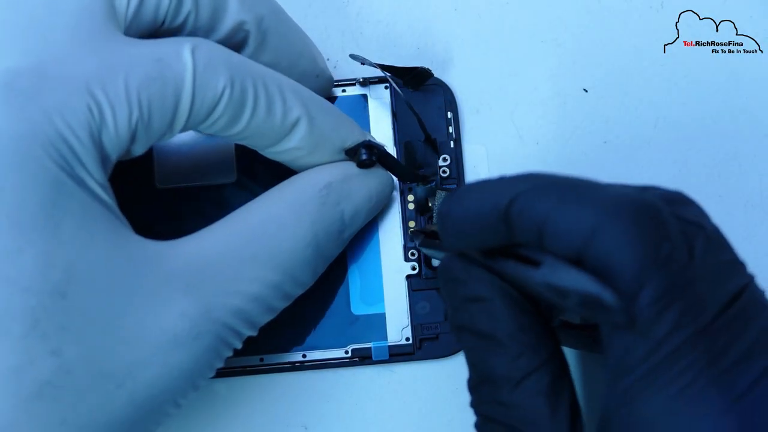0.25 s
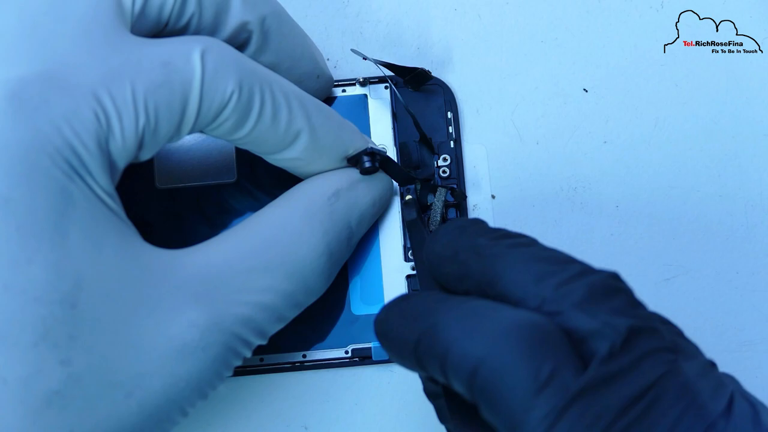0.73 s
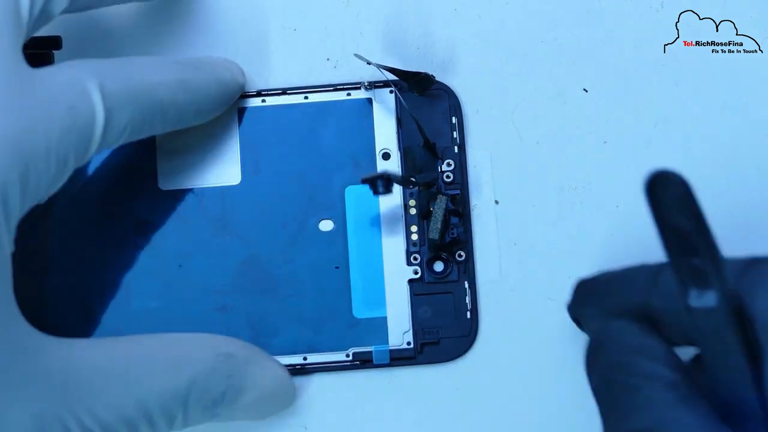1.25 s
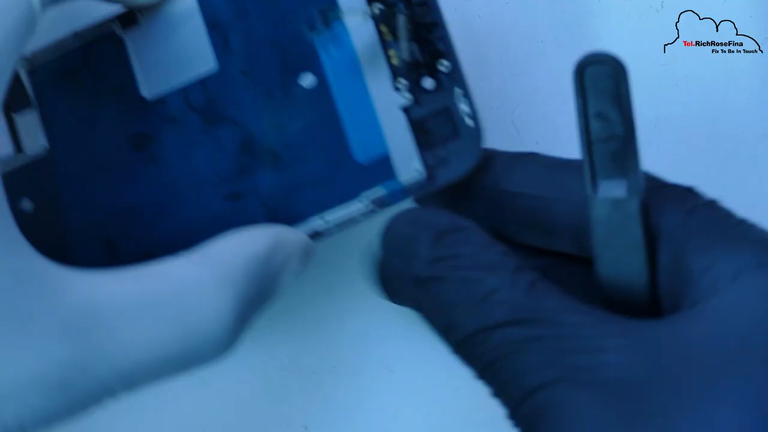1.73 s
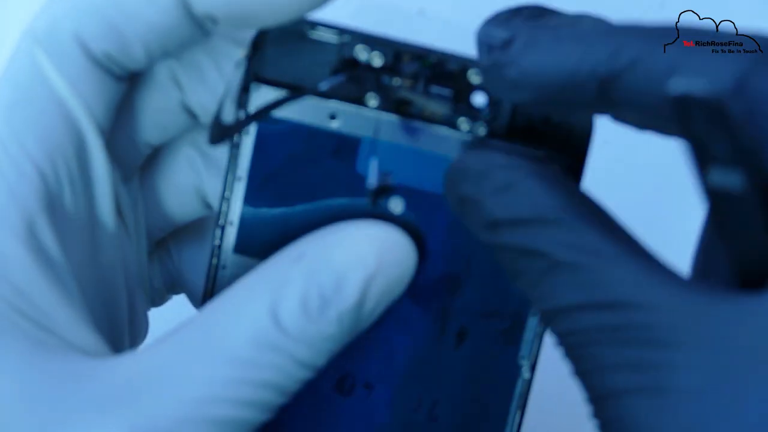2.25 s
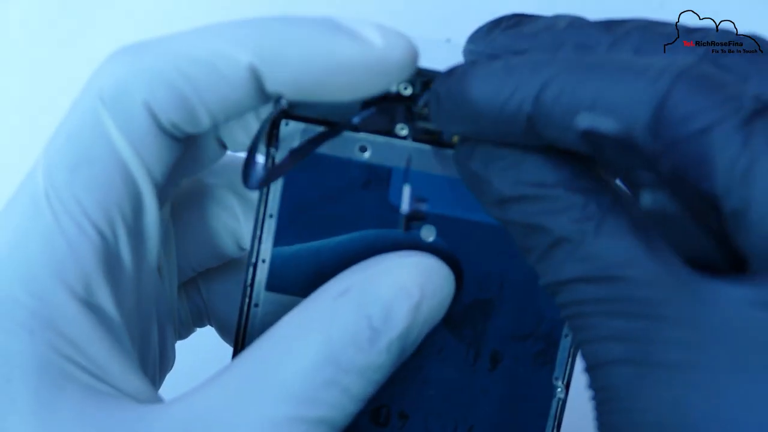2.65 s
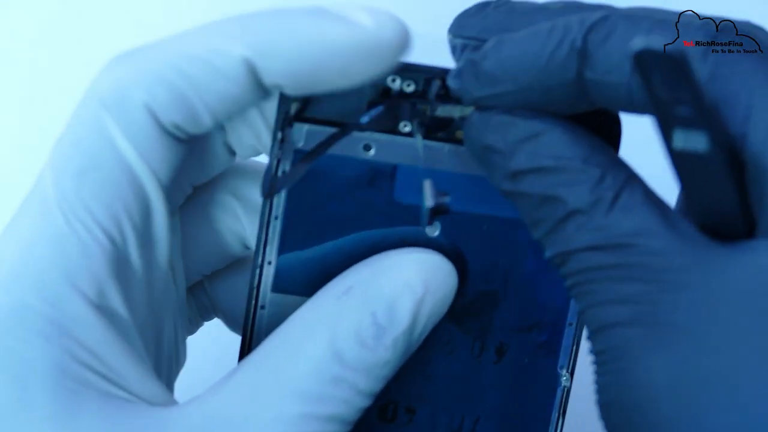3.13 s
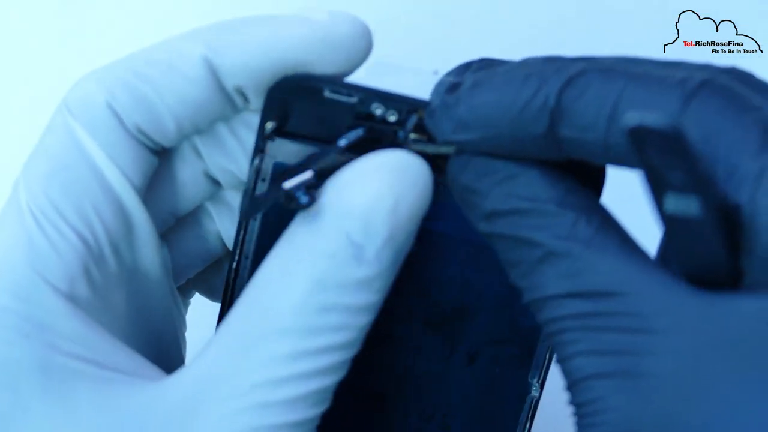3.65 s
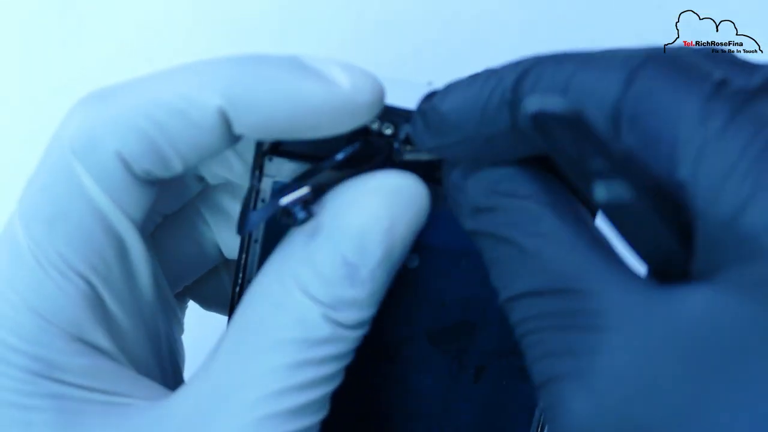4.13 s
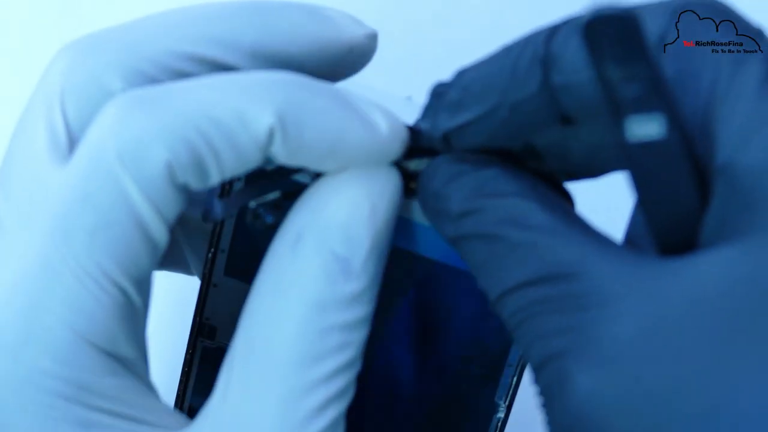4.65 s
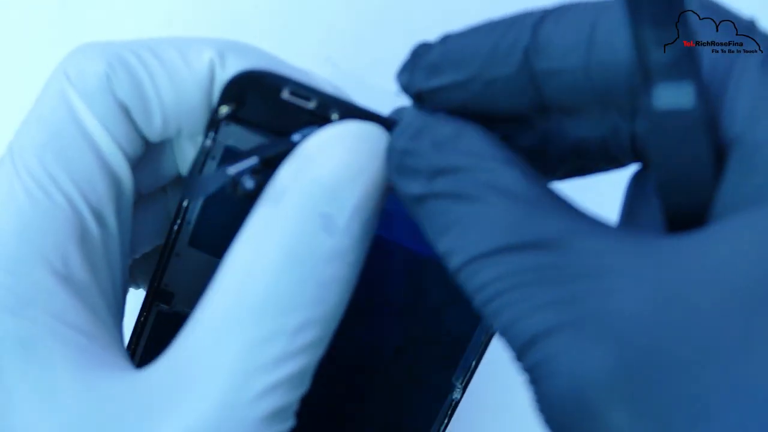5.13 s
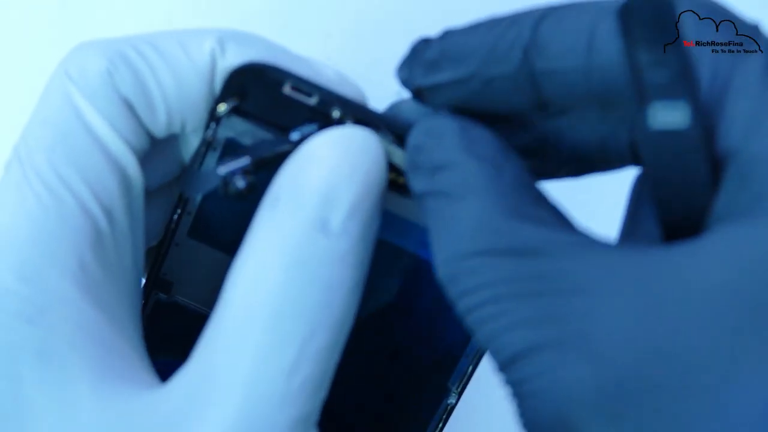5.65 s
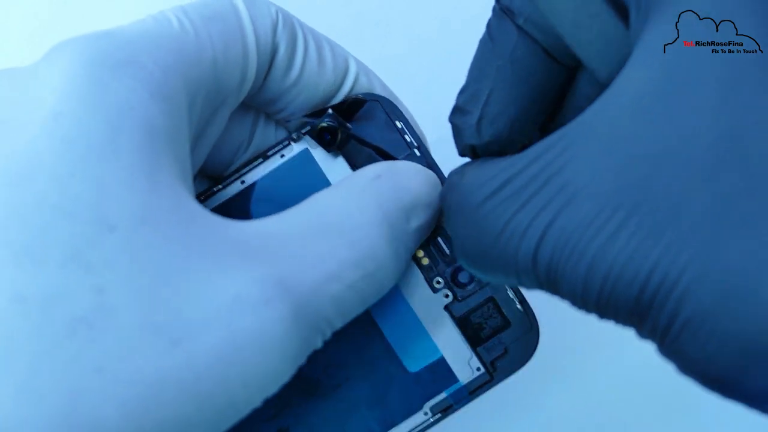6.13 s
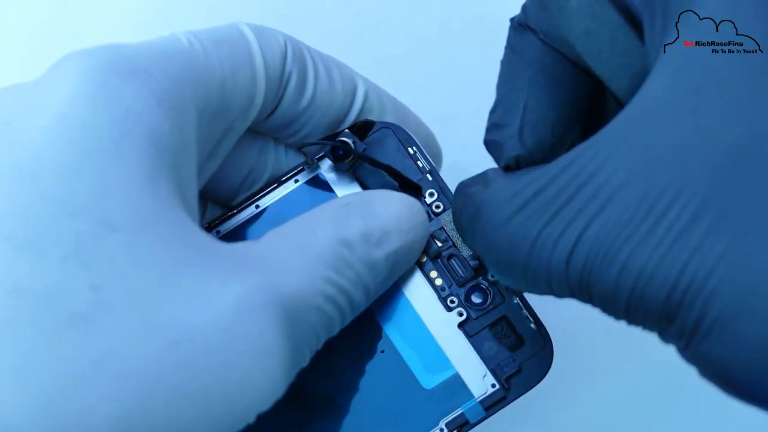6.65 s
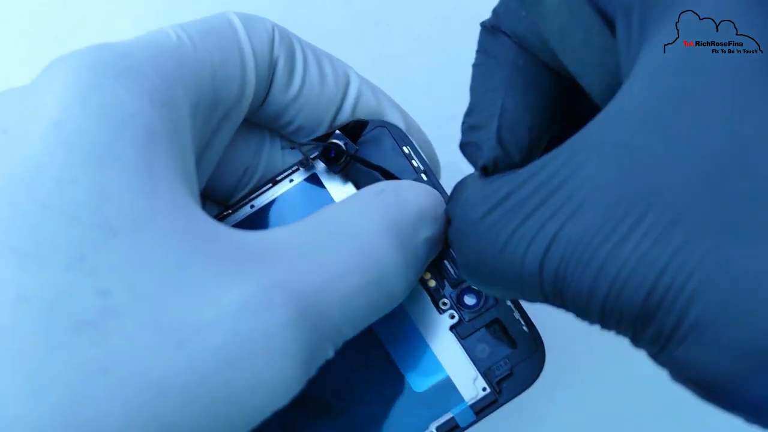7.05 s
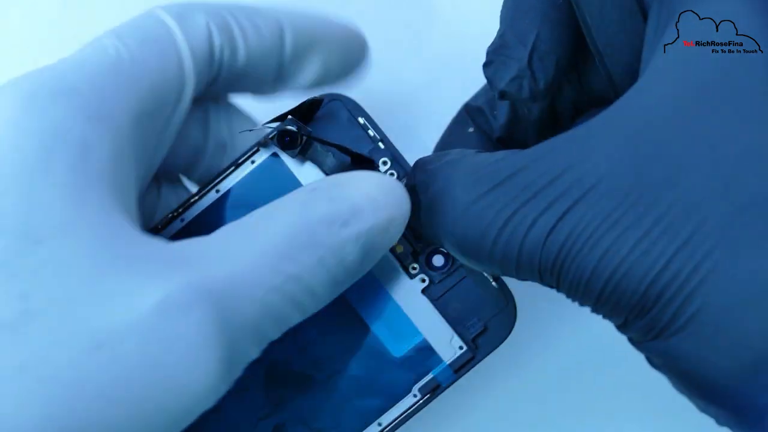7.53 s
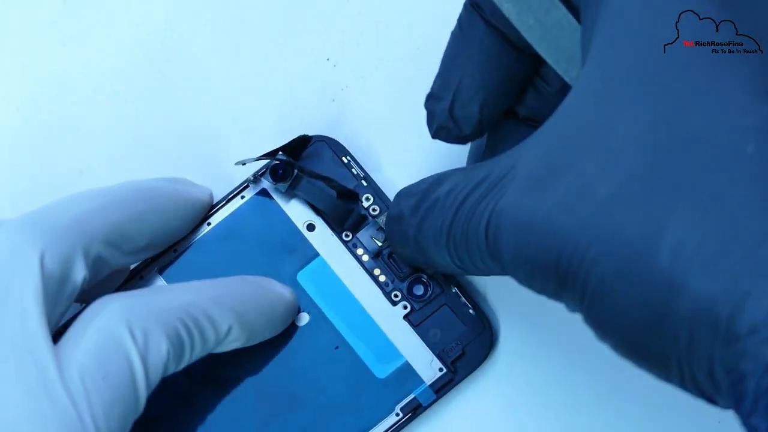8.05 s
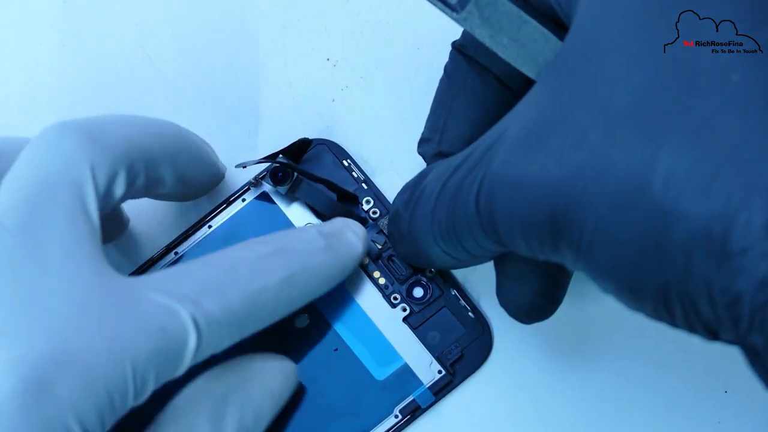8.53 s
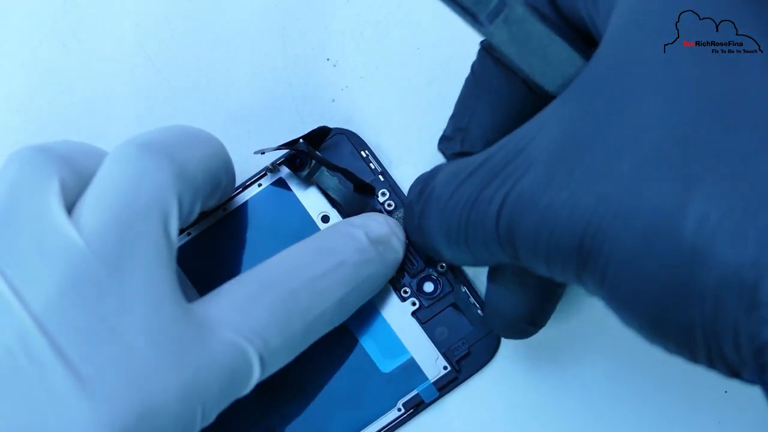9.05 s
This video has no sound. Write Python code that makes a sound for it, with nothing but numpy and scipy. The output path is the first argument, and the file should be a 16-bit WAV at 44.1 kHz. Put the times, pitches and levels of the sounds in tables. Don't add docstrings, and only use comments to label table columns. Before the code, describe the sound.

Crisp tweezer clicks and faint ticks on small plastic and glass parts, soft rubber glove rustle, and a steady whirring fan with a low wavering hum.

```python
import sys
import numpy as np
from scipy import signal
from scipy.fft import rfft, irfft, next_fast_len
from scipy.io import wavfile
from scipy.ndimage import uniform_filter1d, map_coordinates

SR = 44100
rng = np.random.default_rng(int(sys.argv[2]) if len(sys.argv) > 2 else 0)


def int16_out(signal):
    q = np.round(np.clip(np.atleast_2d(signal).T, -1, 1) * 32767)
    wavfile.write(sys.argv[1], SR, q.astype(np.int16))


def boost(x):
    u = np.asarray(x, float) / 20
    return 10 ** u


N = 410130
T = np.arange(N) / SR


def unit(x):
    return x / np.sqrt(np.mean(x ** 2) + 1e-20)


def along(points, hz):
    f, v = np.transpose(points)
    return np.interp(np.log(hz + 1), np.log(f + 1), v)


def wobble(rate):
    coarse = T[::32]
    knots = rng.standard_normal(int(N * rate / SR) + 4)
    return np.interp(T, coarse, map_coordinates(knots, [coarse * rate]))


def bumps(rows):
    coarse = T[::32]
    level = sum(db * np.exp(-((coarse - s) / half) ** 2) for s, db, half in rows)
    return np.interp(T, coarse, level)


def filtered(x, response):
    m = next_fast_len(x.shape[-1] + 4096)
    return irfft(rfft(x, m) * response(np.fft.rfftfreq(m, 1 / SR)), m)[..., :x.shape[-1]]


def peak(hz, width_hz):
    return lambda f: 1j * f * width_hz / (hz * hz - f * f + 1j * f * width_hz + 1e-9)


def noise(response):
    return unit(filtered(rng.standard_normal(N), response))


def decay(t, t60):
    return boost(-60 * t / t60)


def sine(hz, t):
    return np.sin(2 * np.pi * hz * t)


def add(track, s, sound):
    spot = track[round(s * SR):][:len(sound)]
    spot += sound[:len(spot)]


# (time [s], level [dB], snap [Hz], plastic body re snap [dB], body [Hz])
CLICKS = [(1.4008, -12.5, 14200, -19, 2800), (1.43, -35.5, 9200, 4, 2000),
          (1.7325, -17.5, 13800, -24, 3600), (2.6035, -21.5, 14700, -21, 5500),
          (3.0358, -28, 14000, -14, 4900), (3.1066, -22.5, 14700, -13, 5570),
          (3.8052, -20, 13000, -17, 6500), (4.0022, -19, 14200, -16, 5200), (4.1363, -24, 13400, -24, 3400),
          (4.8006, -21, 14100, -18, 3500), (4.9691, -13.5, 10900, -15, 5000),
          (5.2675, -20.5, 9600, -29, 2200), (5.702, -31.5, 15000, -7.5, 3100),
          (7.534, -21.5, 6100, -13, 6500), (7.6618, -14, 10200, -9, 5170), (7.9821, -20, 8400, -24, 6400),
          (8.1503, -31, 11000, -6, 4800), (8.1706, -4, 8200, -23, 5300)]
# (time [s], level [dB], snap [Hz], body re snap [dB], body [Hz])
RASPS = [(0.0671, -27, 12000, -16, 2500), (0.3548, -28, 13400, -11, 4300), (1.406, -36, 14500, -13, 6100),
         (1.62, -29.5, 10600, -7, 6500), (1.971, -26.5, 13100, -21, 1700), (2.0028, -35, 14400, -18, 1400),
         (2.2052, -36, 5900, -14, 1700), (2.2116, -38, 13300, -16, 5400), (3.9398, -36, 12900, -7, 1300),
         (3.9444, -37, 13700, -20, 4500), (3.9528, -30, 13600, -6, 3300), (8.1847, -38, 8900, -6, 6000)]
# (time [s], level [dB], snap [Hz], body [Hz])
NUDGES = [(0.2258, -32, 11400, 1900), (0.7855, -37, 4700, 3170), (0.9852, -34, 12800, 10000),
          (1.005, -34, 12000, 2000), (1.4156, -28, 5500, 2000), (1.436, -36, 4700, 5600),
          (1.823, -36, 8000, 5700), (1.8469, -38, 12100, 900), (1.8512, -30.5, 9000, 4300),
          (2.0907, -42, 6200, 1700), (2.399, -36, 5800, 5500), (2.726, -37.5, 9000, 1900),
          (3.8186, -41, 12200, 4800), (3.8286, -43, 5200, 4900), (3.8842, -31, 13000, 5370),
          (3.948, -34, 14300, 5100), (3.9983, -31, 14400, 12000), (4.016, -37, 14200, 1500),
          (4.0228, -37, 14100, 4000), (4.07, -31, 13400, 4700), (4.0738, -42, 5000, 5000),
          (4.5965, -34.5, 4000, 3100), (4.9908, -34, 14500, 1000), (5.2592, -32.5, 13700, 900),
          (7.988, -27, 14000, 9000)]
# (time [s], level [dB], snap [Hz])
FLICKS = [(0.2104, -37, 12700), (0.5967, -36, 10100), (1.1255, -32, 14800), (1.1688, -38, 9600),
          (1.2534, -36, 7500), (1.6257, -35, 10300), (1.8712, -33, 13400), (1.9933, -27, 10000),
          (2.318, -32, 13500), (2.541, -32, 13900), (2.72, -35, 14400), (2.739, -37, 14700),
          (3.1421, -37, 9550), (3.814, -37, 13200), (4.1029, -32, 14600), (4.5032, -34, 14000),
          (4.5854, -29, 14000), (4.7385, -33, 13100), (4.8126, -35, 14700), (4.8654, -34, 14200),
          (4.9389, -33, 14600), (4.9442, -31, 14600), (6.1046, -34, 11900), (6.9495, -33, 13800),
          (7.6025, -39, 7900), (9.2943, -29.5, 12800), (2.78, -38, 14500), (2.79, -36, 14500),
          (8.1708, -22, 12700)]


def contacts():
    clicks = [(s, db, hz, body_db, -21, body_hz) for s, db, hz, body_db, body_hz in CLICKS]
    rasps = [(s, db, hz, body_db, -5, body_hz) for s, db, hz, body_db, body_hz in RASPS]
    nudges = [(s, db, hz, -3.5, -8, body_hz) for s, db, hz, body_hz in NUDGES]
    flicks = [(s, db, hz, -13, -13, 4000) for s, db, hz in FLICKS]
    return clicks + rasps + nudges + flicks


# (centre [Hz], width [Hz], level [dB])
PANEL = [(650, 360, -3), (1300, 1050, -5), (2500, 230, -12), (4500, 2800, -13), (6000, 720, -44)]


def ticks():
    out, t = np.zeros(N), np.arange(1600) / SR

    def panel(f):
        return sum((-1) ** k * boost(db) * peak(c, w)(f) for k, (c, w, db) in enumerate(PANEL))

    def echo(f):
        return 1 + 0.1 * np.exp(-2j * np.pi * f * 0.0027)

    for s, db, hz, body_db, ring_db, body_hz in contacts():
        def bright(f):
            high = peak(hz, .33 * hz)(f) - 0.22 * peak(14000, 8000)(f)
            return high * peak(12000, 22000)(f) + 0.22 * peak(4500, 5000)(f)

        blow_noise, ring_noise, body_noise = rng.standard_normal((3, len(t)))
        blow = (0.12 * blow_noise + (t == 0)) * decay(t, 0.0018)
        snap = filtered(blow, lambda f: bright(f) * echo(f))
        two_slopes = decay(t, 0.022) + 0.2 * decay(t, 0.094)
        ring = filtered(ring_noise, bright) * two_slopes * (t > .0008)
        swell = 1 - np.exp(-t / 0.00014)
        body = filtered(body_noise * swell * decay(t, 0.024),
                        lambda f: panel(f) + peak(body_hz, .4 * body_hz)(f))
        sound = 0.96 * snap / np.abs(snap).max() + boost(ring_db + 5.5) * ring
        sound = sound + boost(body_db - 1) * body / np.abs(body).max()
        add(out, s - .0002, boost(db + 4.5) * sound)
    return out


RINGS = {.0668: [(2010, -28, 0.024), (2720, -24.5, 0.014), (3120, -25, 0.014), (9950, -23, 0.012),
         (12000, -31, .012)], .0812: [(1985, -43, .03), (2900, -36, .012)], 1.4006: [(7850, -24, .009),
         (14200, -26, .014), (12000, -26, .006), (3100, -34, 0.013)], 1.4095: [(13500, -32, .005),
         (10000, -34, .005)], 1.4165: [(2000, -37, 0.081), (2930, -36, .03), (4300, -32, 0.022),
         (7600, -38, .012)], 1.4195: [(5900, -32, .03), (9640, -34, .04)], 3.8846: [(5400, -27, .012)],
         4.9696: [(365, -36.5, 0.2), (610, -31.5, 0.06), (8500, -21, .005), (4400, -29, .016),
         (1000, -29, 0.044), (1230, -27, .055), (1490, -26, 0.041), (1960, -29, 0.028), (2490, -26, 0.041),
         (3480, -33, .03), (5000, -27, 0.02)], 7.195: [(2790, -45, 0.1)], 7.6631: [(633, -28, .045),
         (1257, -35, 0.035), (1640, -29, .03), (2100, -26, 0.026), (2500, -24, 0.028), (4650, -24, 0.0076),
         (5600, -24, .011), (9840, -28, .016), (3300, -32, 0.012), (6200, -31, .014), (14300, -32, .016)],
         7.6618: [(14300, -18, .005), (4300, -30, .006), (2710, -21, 0.0072)], 7.9817: [(8400, -15, 0.005),
         (13000, -27, .008)], 7.9885: [(8060, -21, .008), (14000, -31, .008)],
         7.9912: [(5300, -25.5, .012)], 8.1706: [(14500, -17, .003), (12700, -9, .004), (4300, -34, 0.0051),
         (2000, -32, 0.026), (7320, -26, .014), (293, -36.5, 0.069), (137, -40, 0.098)]}
MORE_RINGS = {.0669: [(2400, -24, 0.0095), (12600, -28, .008), (5900, -32, .01)], .3552: [(3850, -35, .015)],
              1.1072: [(11600, -40, .008), (14500, -40, .006)], 1.1685: [(9700, -38, .008),
              (7000, -42, .006)], 1.361: [(2620, -40, .05)], 1.4063: [(14500, -30, .005), (10200, -33, .006)],
              3.1068: [(7600, -30, .01), (9600, -30, .006), (14800, -27, .006)], 3.1285: [(13000, -40, .005)],
              3.8052: [(8200, -27, .004)], 3.883: [(13000, -34, .012)], 3.944: [(13700, -33, .03)],
              3.9981: [(15000, -27, .003), (5000, -34, .003)], 3.9482: [(9200, -28, .005),
              (11800, -31, .005)], 3.953: [(14000, -28, .006), (11000, -30, .005)], 4.969: [(8000, -20, .003),
              (12500, -23, .003)], 4.992: [(14000, -34, .012)], 4.996: [(6100, -34, .01)],
              7.662: [(10600, -20, .006)], 7.6635: [(5800, -22, .006)], 7.668: [(2400, -32, .01),
              (600, -34, .01)], 7.984: [(8600, -23, .005)], 7.9905: [(15500, -22, .008), (12400, -30, .008)],
              7.9932: [(5900, -27, .009)], 8.1707: [(6200, -16, .004)], 8.172: [(8650, -18, .008)],
              8.179: [(6500, -33, .006)], 8.197: [(6500, -38, .004)]}
TINTS = {1.7326: [(7100, -31, .008)], 1.971: [(8300, -36, .014)], 1.9935: [(13000, -36, .008)],
         2.091: [(13500, -36, .004)], 3.884: [(2500, -37, .014), (3800, -39, .012)],
         4.0012: [(5100, -27, 0.013), (8400, -25, 0.0088), (14300, -28, .008)],
         4.0155: [(14500, -31, .005)], 4.068: [(12600, -34, .015)], 4.1362: [(7900, -33, .008),
         (5400, -34, .008), (13800, -26, .008)], 4.8007: [(7800, -36, .008)], 4.9689: [(3700, -22, .004),
         (1500, -24, .005)], 5.2675: [(13800, -26, .007)], 7.6617: [(1500, -22, .006), (7600, -25, 0.0037),
         (3700, -18, .004)], 7.989: [(1200, -33, .02)], 8.1705: [(8400, -9, .004), (5500, -14, .003)],
         8.7891: [(4700, -35, .005), (15200, -36, .004)], 2.399: [(5900, -36, .012)],
         2.6036: [(14700, -29, .008)], 7.973: [(12000, -37, .006)], 7.6632: [(800, -28, .03)],
         4.97: [(2100, -29.5, .02), (432, -35, 0.063)]}


def rings():
    out, t = np.zeros(N), np.arange(6000) / SR
    rise = 1 - np.exp(-t / 0.00026)
    for s, modes in [*RINGS.items(), *MORE_RINGS.items(), *TINTS.items()]:
        ringing = sum(boost(db) * decay(t, t60) * sine(hz, t) for hz, db, t60 in modes)
        add(out, s, rise * ringing)
    return out


# (time [s], level [dB], low-cut corner [Hz], treble corner / 5.1 [Hz], t60 [s])
KNOCKS = [
    (.067, -32, 5000, 900, 0.015),
    (0.08, -39, 1200, 800, .015),
    (4.9692, -29, 600, 1790, 0.034),
    (7.5332, -35, 2000, 5000, 0.014),
    (7.663, -30.5, 604, 2100, 0.044),
    (8.171, -38, 2200, 2500, 0.011),
]


def knocks():
    out, t = np.zeros(N), np.arange(2500) / SR
    rise = 1 - np.exp(-t / 0.00032)
    for s, db, low_hz, high_hz, t60 in KNOCKS:
        def band(f):
            highpass = (1j * f / (low_hz + 1j * f)) ** 2
            return highpass * (2.2 * high_hz / (5.1 * high_hz + 1j * f)) ** 3

        burst = filtered(rng.standard_normal(len(t)), band)
        dull = filtered(burst, lambda f: 1500 / (1500 + 1j * f))
        slow_tail = 0.9 * unit(dull) * boost(-35 * t / t60)
        add(out, s, boost(db) * (unit(burst) * decay(t, t60) + slow_tail) * rise)
    return out


# (time [s], level [dB], thud [Hz], t60 [s])
TAPS = [(.082, -35.5, 303, .06), (.226, -40, 302, 0.058), (1.4262, -26.5, 300, 0.052),
        (1.55, -33, 200, 0.049), (1.8, -38, 290, 0.048), (2.23, -27, 212, 0.022), (2.6, -44, 298, .05),
        (4.97, -29, 313, 0.096), (7.664, -24, 340, 0.029), (8.171, -32, 226, 0.033), (1.406, -40, 80, .08),
        (1.59, -37, 308, .05), (3.029, -42, 220, 0.056), (9.24, -42, 346, 0.045)]


def taps():
    out, t = np.zeros(N), np.arange(SR) / SR
    rise = 1 - np.exp(-t / 0.0019)
    for s, db, hz, t60 in TAPS:
        thud = sine(hz, t) + 0.33 * sine(2.1 * hz, t) + 0.12 * sine(0.52 * hz, t)
        add(out, s, boost(db) * decay(t, t60) * rise * thud)
    return out


# (mode [Hz], level [dB], t60 [s])
STAND = [(53.8, -6.5, 0.44), (108.8, 3, 0.57)]


def stand():
    out, t = np.zeros(N), np.arange(SR) / SR
    hum = sum(boost(db) * decay(t, t60) * sine(hz, t) for hz, db, t60 in STAND)
    add(out, 4.972, boost(-25.0) * (1 - np.exp(-t / 0.039)) * hum)
    swing = 2 * np.pi * 5.2 * (t - .172)
    sway = np.cos(swing) + 0.17 * np.cos(2.32 * swing) + 0.12 * np.cos(3.9 * swing)
    build_up = 1 - np.exp(-(t / 0.17) ** 2)
    add(out, 4.972, boost(-13.5) * decay(t, 1.76) * build_up * sway * (t < .8))
    return out


def pop():
    out, t = np.zeros(N), np.arange(900) / SR
    away = np.abs(t - .004)
    recoil = 0.12 * np.exp(-away / 0.013) * (t > .004)
    spike = np.exp(-away / .0001) + 0.25 * np.exp(-away / .0012) - recoil
    add(out, 6.0203, -boost(-17.0) * spike)
    return out


# (time [s], level [dB], centre [Hz], length [s])
SCRAPES = [(0.651, -47, 4940, 0.067), (0.999, -42, 9000, .012), (1.092, -43.5, 12000, 0.038),
           (1.13, -47.5, 6000, 0.095), (1.256, -48, 7000, 0.14), (1.404, -32, 13000, 0.013),
           (1.411, -34, 4500, 0.028), (1.505, -45.5, 4940, 0.067), (1.611, -39.5, 9100, 0.023),
           (1.828, -41, 7000, 0.045), (3.805, -41, 12000, 0.032), (3.881, -41, 13000, .009),
           (3.943, -40, 12000, .013), (4.062, -44, 11000, 0.011), (6.38, -50, 13000, .015),
           (6.675, -47, 11000, .015), (7.23, -48.5, 11000, .03), (7.313, -49, 13000, .02),
           (7.979, -38, 12000, 0.027)]


def scrapes():
    out = np.zeros(N)
    for s, db, hz, length in SCRAPES:
        u = np.arange(4000) / SR / length
        grains = np.repeat(rng.standard_normal(200), 20)
        grit = rng.standard_normal(4000) * boost(3.1 * grains)
        stroke = np.clip(8 * u, 0, 1) * np.exp(-np.clip(u, 0, 3) ** 4)
        add(out, s, boost(db) * stroke * unit(filtered(grit, peak(hz, 2.3 * hz))))
    return out


# (time [s], level [dB], pitch [Hz], length [s])
SQUEAKS = [(0.076, -45, 1950, 0.044), (0.215, -43.5, 1714, 0.032), (0.282, -48, 1636, 0.21),
           (.425, -47, 2300, 0.096), (0.522, -48, 2010, 0.075), (0.909, -43, 2810, 0.067),
           (1.065, -49, 2130, 0.069), (1.843, -39, 650, 0.024), (3.818, -40, 4900, .024),
           (3.84, -43, 10300, 0.022), (4.575, -48, 2000, 0.025), (7.454, -41, 1710, 0.049),
           (7.853, -44, 1680, 0.035), (7.88, -50, 2480, .06)]


def squeaks():
    out, t = np.zeros(N), np.arange(8000) / SR
    sag = .3
    for s, db, hz, length in SQUEAKS:
        slip = np.cumsum(rng.normal(0, .0015 * hz ** .5, 8000))
        grip = 1 + .7 * np.cos(4 * slip)
        swell = np.sin(np.pi * np.clip(t / length, 0, 1))
        tone = np.sin(2 * np.pi * hz * t * (1 - sag * t / 2) + slip)
        add(out, s, boost(db - 2.0) * grip * swell * tone)
    return out


# (time [s], glove rustle level [dB])
HANDS = [(0.0, -54), (0.7, -56), (1.03, -49), (1.42, -49), (1.6, -53), (1.94, -48.5), (2.67, -55.5),
         (3.03, -53), (3.75, -56), (3.96, -50), (4.3, -54), (5.7, -54), (6.14, -50.5), (6.37, -57),
         (7.07, -56), (7.72, -49), (8.6, -59.5), (9.3, -52)]
# (time [s], rub level change [dB], half-length [s])
RUBS = [
    (1.33, 6.5, 0.09),
    (4.7, -16, .15),
    (8.25, 7.5, 0.15),
    (3.46, -14, 0.37),
]


def gloves():
    rustle_db = np.interp(T, *np.transpose(HANDS))
    rub_db = -59.5 + 0.91 * (rustle_db + 55) + bumps(RUBS)
    crackle_db = np.clip(2.8 * wobble(330) + 1.2 * wobble(37), -9, 5.5)
    crackle = rng.standard_normal(N) * boost(crackle_db)

    def rubber(f):
        return peak(14000, 9000)(f) * peak(11000, 16000)(f) + 0.065 * peak(3500, 4500)(f)

    rustle = unit(filtered(crackle, rubber))
    rub = boost(4.1 * wobble(25)) * noise(lambda f: peak(270, 300)(f) ** 2)
    return boost(rustle_db - 3.5) * rustle + boost(rub_db - 6) * rub


# (frequency [Hz], density [dB per Hz])
FAN = [(130, -14.5), (250, -23), (440, -20), (540, -12.5), (1000, -12), (1400, -14.5), (1950, -20),
       (2600, -19.5), (3400, -23), (6000, -24.5), (8000, -28.5), (10000, -29.5), (12500, -34.5),
       (15800, -34)]
# (centre [Hz], width [Hz], level [dB])
DUCT = [(182, 12, 3.5), (784, 26, 9.5), (900, 16, -2), (1200, 180, 4.5), (4210, 147, 13), (4630, 125, 13),
        (5270, 150, 6.5), (5830, 250, 8), (6340, 210, 0), (7350, 450, 7), (8650, 300, 15.5),
        (9450, 350, 10.5), (12700, 200, 14), (14700, 250, 11)]


def fan_air():
    def housing(f):
        return np.sqrt(1 + sum(boost(db) * np.abs(peak(c, w)(f)) ** 2 for c, w, db in DUCT))

    air = noise(lambda f: boost(along(FAN, f)) * housing(f) * (f > 120))
    return boost(-45.0 + 0.059 * wobble(9.5)) * air


WHINE = {2: -67, 3: -55, 5: -54, 6: -57, 8: -64, 10: -67, 12: -73, 14: -68, 21: -72, 22: -66.5, 25: -68.5,
         28: -68.5, 31: -86, 36: -71, 45: -80}
SECOND_MOTOR = {1: -71, 2: -67, 3: -60.5, 20: -68}


def fan_tones():
    shaft = 186.4 * np.cumsum(1 + 0.000483 * wobble(3)) / SR
    second_shaft = 259.9 * np.cumsum(1 + 0.00293 * wobble(6)) / SR

    def tone(db, turns):
        return boost(db + 3 + 1.28 * wobble(9)) * np.sin(2 * np.pi * (turns + rng.random()))

    whine = sum(tone(db, k * shaft) for k, db in WHINE.items())
    return whine + sum(tone(db, k * second_shaft) for k, db in SECOND_MOTOR.items())


# (time [s], level re steady [dB], half-length [s])
SURGES = [(1.75, -4, 0.26), (2.68, -11, 0.096), (2.84, 15, 0.067), (3.08, -7, .1), (3.38, 9, 0.041),
          (4.6, -16, 0.084), (4.78, 6, 0.076), (5.08, -3, 0.15), (5.3, 3.5, 0.28), (5.72, 11, .04),
          (6.27, -4.5, 0.18), (6.5, 10.5, 0.11), (6.75, 8, 0.21), (6.92, -14, 0.043), (7.0, 3.5, .08),
          (7.45, -2, .1), (7.7, 5.5, 0.22), (8.2, 6.5, 0.29), (9.17, 5.5, 0.095)]


def fan_hum():
    turns = np.cumsum(117 + 2.38 * wobble(10)) / SR
    hum = boost(-56 + bumps(SURGES) + 1.6 * wobble(14)) * np.sin(2 * np.pi * turns)
    return hum + boost(-64.5) * noise(lambda f: peak(104, 26)(f) ** 2)


# (time [s], rumble level change [dB], half-length [s])
SHAKES = [
    (1.45, 5.5, 0.31),
    (5.2, 4, .2),
    (7.8, 5, .3),
    (9.15, 4, 0.23),
]


def stand_rumble():
    return boost(-58 + bumps(SHAKES)) * noise(lambda f: peak(30, 60)(f) * peak(25, 90)(f))


def scene():
    handling = ticks() + rings() + knocks() + taps() + stand() + pop()
    friction = scrapes() + squeaks() + gloves()
    mono = handling + friction + fan_air() + fan_tones() + fan_hum() + stand_rumble()
    return np.array([mono, mono])


# (from [s], to [s])
SILENCES = [
    (5.7588, 5.8042),
    (8.7745, 8.789),
]


def silence_gate():
    gates = [np.clip(np.maximum((start - T) / .0007, (T - end) / .00015), 0, 1) for start, end in SILENCES]
    return np.prod(gates, axis=0)


# (pitch [Hz], level [dB], t60 [s], length [s])
LINGERING_TONE = (2750, -58, .1, .022)


def lingering_tone():
    hz, db, t60, length = LINGERING_TONE
    t = T[:round(length * SR)]
    return boost(db) * decay(t, t60) * np.cos(np.pi / 2 * t / length) * sine(hz, t)


# (frequency [Hz], side re mid [dB])
SIDE_DB = [(60, -25), (110, -29), (200, -25), (380, -23.5), (700, -31), (1290, -36.5), (2380, -22.5),
           (4400, -23.5), (8120, -18.5), (15000, -14)]


def side_trace(mid):
    hz, _, z = signal.stft(mid, SR, nperseg=256)
    size = np.minimum(np.abs(z), np.median(np.abs(z), axis=1, keepdims=True))
    z = size * np.exp(2j * np.pi * rng.random(z.shape)) * boost(along(SIDE_DB, hz) + 5.0)[:, None]
    patches = uniform_filter1d(rng.standard_normal(z.shape), size=3, axis=0)
    patches = uniform_filter1d(patches, size=14, axis=1)
    z = z * boost(3.7 * unit(patches))
    return boost(1.4 * wobble(24)) * signal.istft(z, SR, nperseg=256)[1][:N]


def top_cut(x):
    return signal.sosfilt(signal.butter(12, 16980, fs=SR, output="sos"), x)


def record(dry):
    edge_hz, top_hz = 15770, 16950
    mid = dry[0] / (1 + np.abs(dry[0] / .95) ** 4) ** (1 / 4)
    gate = silence_gate()
    mid = mid * gate
    top = filtered(mid, lambda f: (f >= edge_hz) * (f < top_hz) * boost(-(f - edge_hz) / 45))
    loud = uniform_filter1d(top ** 2, size=300) > boost(-117)
    mid = filtered(mid, lambda f: f < edge_hz) + top * uniform_filter1d(1. * loud, size=200)
    mid = mid * gate
    add(mid, SILENCES[0][0], lingering_tone())
    side = filtered(side_trace(mid), lambda f: f < edge_hz)
    return top_cut(np.array([mid + side, mid - side]))


dry = scene()
out = record(dry)
int16_out(out)
```